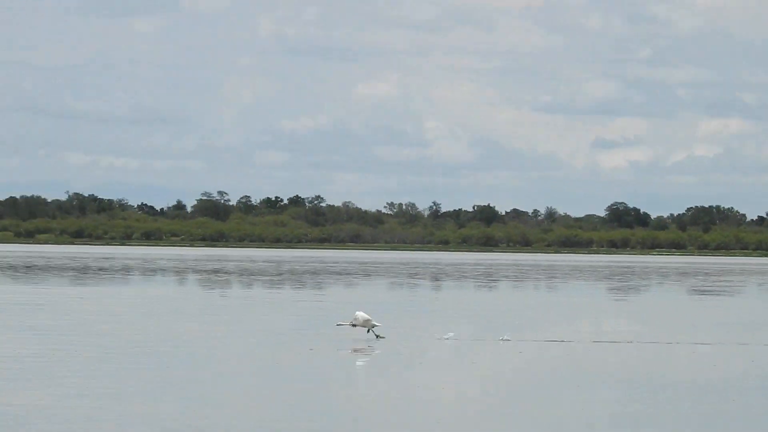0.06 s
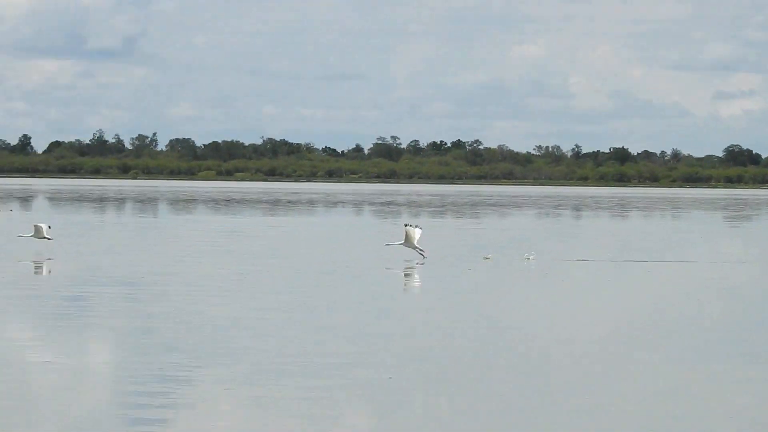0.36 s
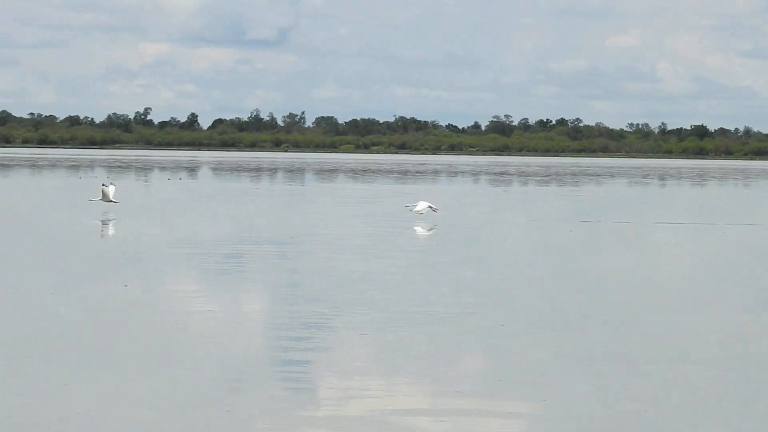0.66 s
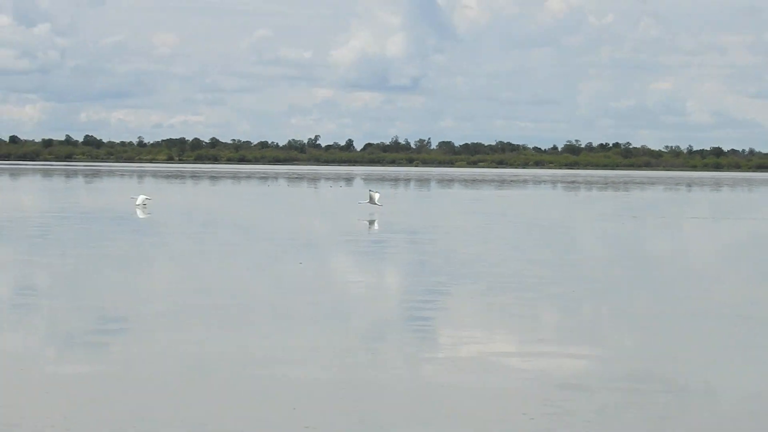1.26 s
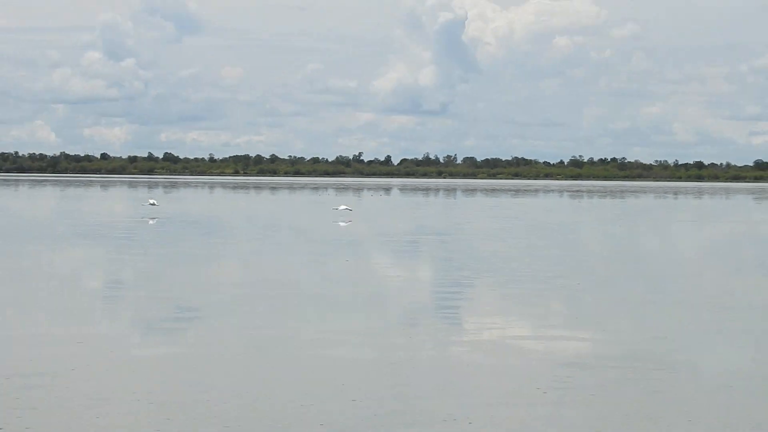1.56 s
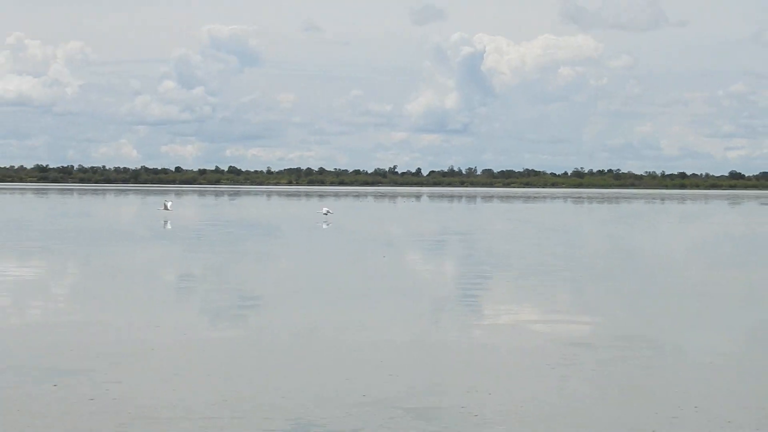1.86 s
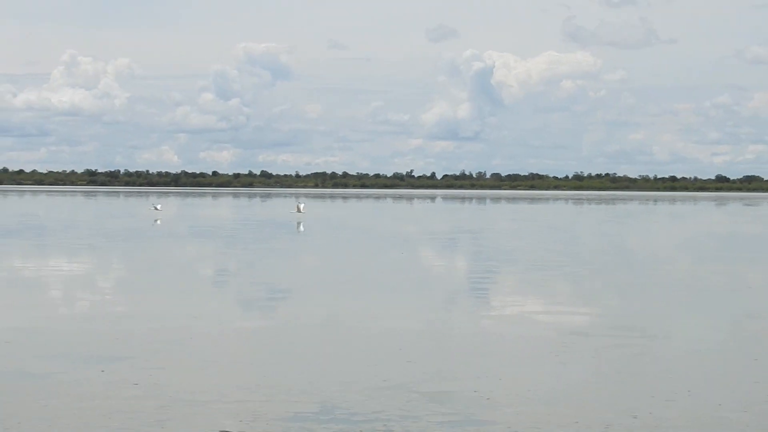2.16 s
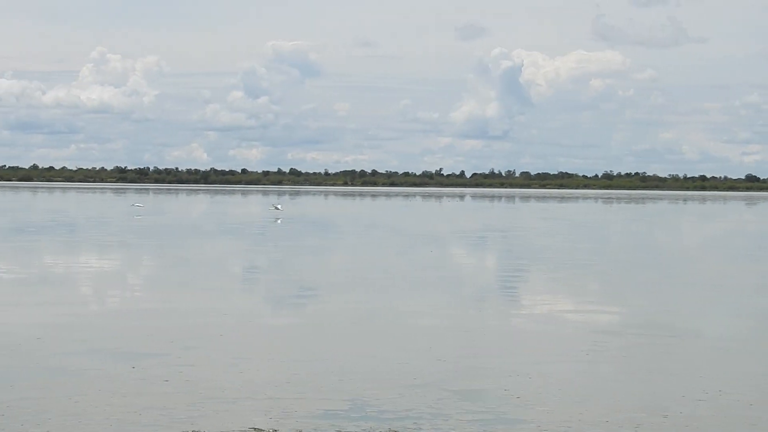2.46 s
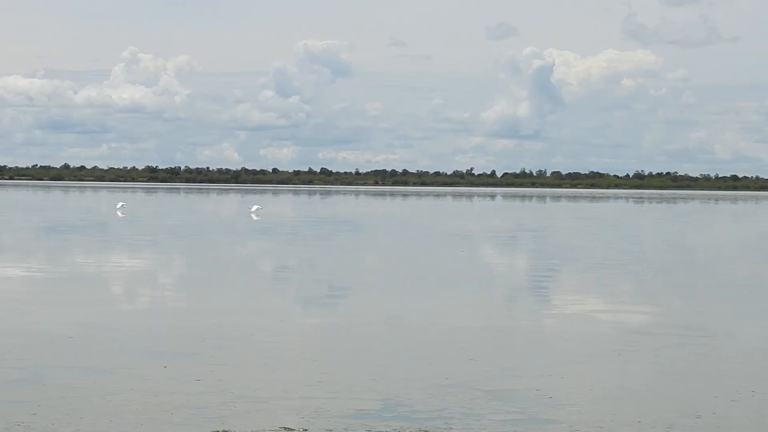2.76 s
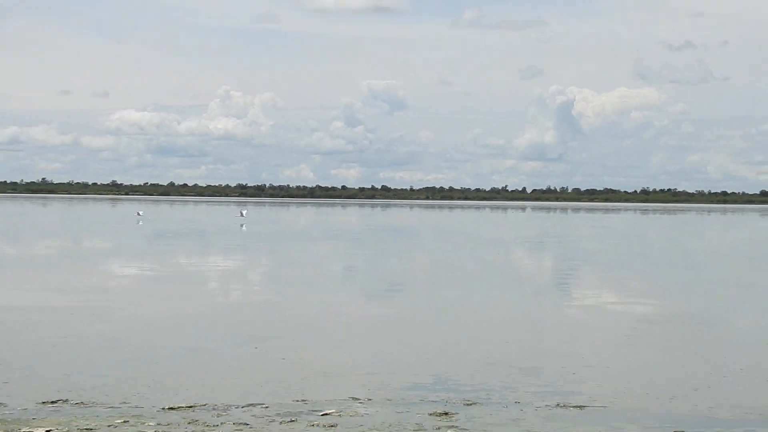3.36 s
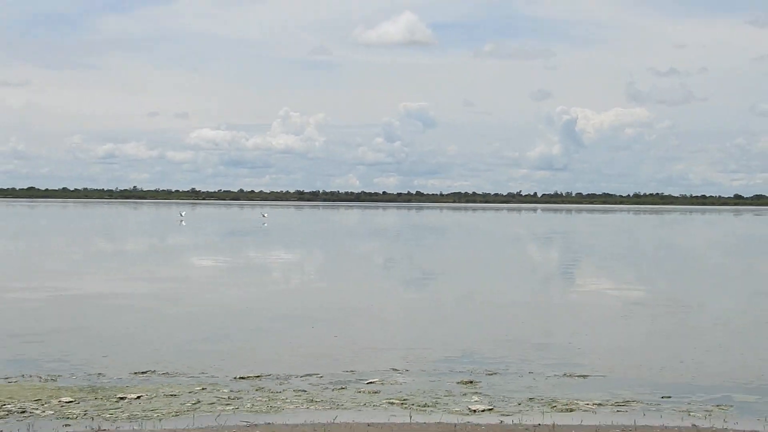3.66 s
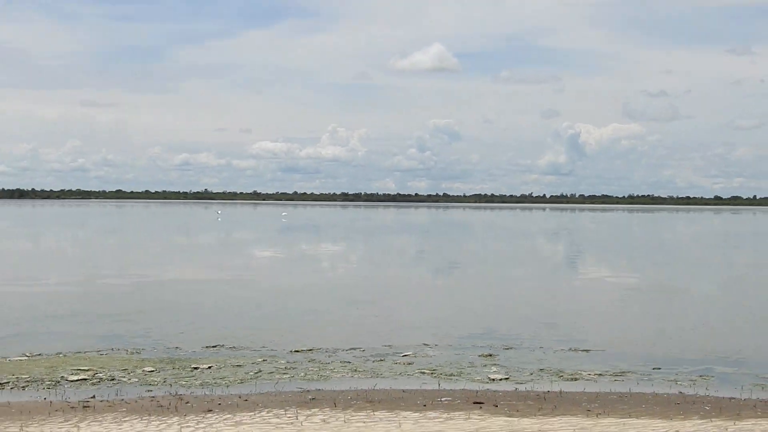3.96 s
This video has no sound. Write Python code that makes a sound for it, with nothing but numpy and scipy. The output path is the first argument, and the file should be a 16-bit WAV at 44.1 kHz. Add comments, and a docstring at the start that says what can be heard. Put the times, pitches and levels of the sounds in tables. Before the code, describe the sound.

Loud waterbird honks, some rough and some clear, overlap over open water, pause briefly, then close with one drawn-out call. Low wind rumble and faint hiss continue beneath, with a soft zoom whir and a few dull pops near the microphone.

```python
"""Two waterbirds trade loud honks over an open lagoon, each honk shaped by a throat and a beak.
One bird rasps, with an undertone an octave below its pitch; the other is clearer and flips
between a low and a high voice. Wind rumbles on the microphone openings over a faint hiss of air.
The camera's zoom motor whirs, stops, and starts again with a click of its lever.
A few dull pops and one short, bright scrape fall in between."""
import sys
import numpy as np
from scipy import signal
from scipy.fft import rfft, irfft, next_fast_len
from scipy.io import wavfile
from scipy.ndimage import uniform_filter1d, map_coordinates

SR = 44100
rng = np.random.default_rng(int(sys.argv[2]) if len(sys.argv) > 2 else 0)


def file_out(sig):
    """Save sig as 16-bit WAV at sys.argv[1]."""
    # one column per channel
    cols = np.atleast_2d(sig).T
    # limit, then scale
    lim = np.clip(cols, -1, 1)
    pcm = np.round(lim * 32767).astype(np.int16)
    wavfile.write(sys.argv[1], SR, pcm)


N = 176400


def amp(db):
    """Turn decibels into a number to multiply by."""
    return 10 ** (np.asarray(db) / 20)


def unit(x):
    """Scale a sound to an average strength (rms) of 1."""
    return x / np.sqrt(np.mean(x ** 2) + 1e-20)


def along(points, hz):
    """Read between rows of (frequency_hz, value), with the octaves evenly spaced."""
    frequencies, values = np.transpose(points)
    return np.interp(np.log(hz + 1), np.log(frequencies + 1), values)


def wobble(rate, size):
    """A smooth random curve through `rate` new values a second."""
    values = rng.standard_normal(size // 8 + 8)
    return map_coordinates(values, [np.arange(size) * rate / SR + 2], mode="wrap")


def filtered(x, response):
    """Turn each frequency up or down, or delay it, as response(hz) says."""
    n = x.shape[-1]
    padded = next_fast_len(n + SR // 8)
    return irfft(rfft(x, padded) * response(np.fft.rfftfreq(padded, 1 / SR)), padded)[..., :n]


def noise(colour):
    """Noise whose tone follows rows of (frequency_hz, gain_db)."""
    return unit(filtered(rng.standard_normal(N), lambda hz: amp(along(colour, hz))))


def wide_noise(colour, alike):
    """Stereo noise; rows of (frequency_hz, likeness) say how alike left and right are, 1 = the same."""
    def shares(hz):
        angle = np.arccos(np.clip(along(alike, hz), -1, 1)) / 2
        return np.array([np.cos(angle), np.sin(angle)])

    mid, side = filtered(np.array([noise(colour), noise(colour)]), shares)
    return unit(np.array([mid + side, mid - side]))


def bird_voice(rows, throat, undertone_db, beak):
    """One unbroken tone through throat and beak; uneven vibration adds undertones and a rough edge."""
    high_voice_hz, second_undertone_hz = 1150, 1287
    quaver, jitter_rad, flutter_db, hoarse_db = 0.0033, 0.24, 4, -11.5
    times, *columns = np.transpose(rows)
    at = np.arange(max(0, int(times[0] * SR)), min(N, int(times[-1] * SR)))
    pitch, level_db, rough = (np.interp(at / SR, times, column) for column in columns)
    n = len(at)
    pitch = uniform_filter1d(pitch, size=300) * (1 + quaver * wobble(130, n))
    phase = 2 * np.pi * np.cumsum(pitch) / SR + jitter_rad * rough * wobble(450, n)
    # In the high voice the vibration repeats every second cycle: a tone at half the pitch.
    high = 1 / (1 + np.exp((high_voice_hz - pitch) / 11))
    half = amp(undertone_db) * high + amp(-26.5) * rough
    # Near one pitch, or when rough, it repeats every fourth cycle: a quarter of the pitch.
    near = np.exp(-((pitch - second_undertone_hz) / 50) ** 2)
    quarter = amp(-7.5) * np.maximum(rough, near) * np.sqrt(half)
    voice, power = np.zeros(n), np.zeros(n)
    for k in np.arange(3, 40):
        multiple = k / 4
        hz = multiple * pitch
        grow = (multiple / 3) ** 0.56  # the in-between tones gain toward the treble
        share = [1, quarter * grow, half * grow, quarter * grow][k % 4]
        gain = amp(along(throat, hz) + beak(at / SR, hz) + flutter_db * wobble(28.54, n))
        hoarse = amp(hoarse_db) * rough * (wobble(380, n) + 1j * wobble(380, n)) / 2
        tone = np.exp(1j * (multiple * phase + rng.uniform(0, 2 * np.pi)))
        voice += gain * np.real((share + hoarse) * tone)
        power += (gain * share) ** 2 / 2
    loudness = amp(level_db + 2.8 * rough * wobble(255, n)) * signal.windows.tukey(n, .04)
    out = np.zeros(N)
    out[at] = loudness * voice / np.sqrt(power)
    return out


def honk(rows, throat, undertone_db, ring_start_hz, ring_end_hz, ring_db, treble_db):
    """A honk scoops up and sags away; at a flip, one voice dies as the other starts."""
    rise_s, fall_s, edge_bend = .028, 0.029, 0.61
    flip_ratio, flip_s = 1.11, 0.021  # a pitch leap this wide and this quick is a flip
    start, end = rows[0][0] - rise_s, rows[-1][0] + fall_s

    def beak(t, hz, shut_db=-22.5, open_s=0.026, treble_hz=4560, width_octaves=.3):
        """The beak's gain in dB: its ringing pitch slides, and the treble comes in as it opens."""
        ring_hz = np.interp(t, [start, end], [ring_start_hz, ring_end_hz])
        ring = np.exp(-(np.log2(hz / ring_hz) / width_octaves) ** 2)
        treble = treble_db + shut_db * np.exp(-((t - start) / open_s) ** 2)
        return ring_db * ring + treble / (1 + (treble_hz / hz) ** 10)

    def edge(row, shift_s, bend):
        """A lower, fainter, fully rough point where a tone begins or ends."""
        time_s, pitch_hz, level_db, _ = row
        return time_s + shift_s, pitch_hz * bend, level_db - 18.5, 1

    parts = [[edge(rows[0], -rise_s, edge_bend), rows[0]]]
    for before, after in zip(rows, rows[1:]):
        leap = max(before[1] / after[1], after[1] / before[1])
        if after[0] - before[0] < flip_s and leap > flip_ratio:
            parts[-1].append(edge(before, flip_s, 0.94))
            parts.append([edge(after, -flip_s, 0.97)])
        parts[-1].append(after)
    parts[-1].append(edge(rows[-1], fall_s, edge_bend))
    return sum(bird_voice(part, throat, undertone_db, beak) for part in parts)


def across_lagoon(call, echo_db=-7, echo_fade_s=0.091):
    """The shore adds a short echo; the camera body shades and delays one side against the other."""
    # How much louder the left side is: frequency_hz, gain_db
    balance = [(1400, 3.5), (2300, 6), (3400, 1), (5500, -3.5)]
    # How far the left side's wave is ahead: frequency_hz, lead_rad
    lead = [(3800, 0.23), (5400, 2.01), (7500, 2.3)]

    def left_and_right(hz):
        return np.array([amp(side * along(balance, hz) / 2) * np.exp(.5j * side * along(lead, hz))
                         for side in (1, -1)])

    t = np.arange(SR // 4) / SR
    tail = rng.standard_normal((2, len(t))) * np.exp(-np.log(1000) * t / echo_fade_s)
    echo = signal.fftconvolve(call[None], tail / np.linalg.norm(tail[0]), axes=1)[:, :N]
    return filtered(call, left_and_right) + amp(echo_db) * echo


def birds():
    """The rasping bird and the clear one overlap; the clear one's last call is a long wail."""
    # One honk a row: undertone_db, ring_start_hz, ring_end_hz, ring_db, treble_db,
    # then its path as a list of: time_s, pitch_hz, level_db, roughness (0 to 1)
    rasping_honks = [ (1.5, 2700, 2100, 7.2, -0.5, [(0, 1362, -14, 0), (.025, 1345, -17, 0),
                     (.065, 1282, -17.5, .43), (.108, 1245, -19.5, .65)]),
                     (0.5, 3500, 2700, 1.7, 0, [(.535, 1363, -19, .6), (.59, 1382, -15, .02),
                     (.66, 1309, -16.5, .25), (.698, 1230, -19.5, 0.5)]),
                     (3.5, 3000, 5300, 2.6, 0.5, [(1.045, 1064, -20.5, 0.9), (1.06, 1394, -16.5, 0.2),
                     (1.1, 1379, -17, 0.1), (1.16, 1325, -15.5, 0.1), (1.2, 1288, -15.5, .56)]),
                     (-3.5, 4200, 3900, 2.6, 1, [(1.622, 992, -21.5, 0.5), (1.637, 1080, -17.5, 0.3),
                     (1.648, 1388, -16.5, .33), (1.68, 1355, -16.5, 0.2), (1.72, 1270, -17.5, .35),
                     (1.77, 1282, -15.5, 0.3), (1.8, 1244, -18.5, 0.4), (1.82, 1110, -22, 0.5)]),
                     (-4.5, 7000, 4200, 5.2, 1.5, [(2.18, 1294, -18, .35), (2.25, 1284, -16, .12),
                     (2.345, 1257, -19, .2), (2.366, 1200, -26, .6)]),
                     (-6.5, 3000, 2090, 7.1, 1, [(2.675, 942, -23.5, 1), (2.714, 1014, -22, 0.2),
                     (2.728, 1250, -21, 0.9), (2.785, 1298, -14.5, .05), (2.835, 1256, -19.5, 0.4),
                     (2.878, 1200, -21, 0.45)])]
    clear_honks = [ (-41, 3440, 2980, 9.4, 1, [(.285, 987, -18, 1), (.315, 1094, -11, 0.042),
                   (.348, 1113, -16, 0.025), (.38, 1056, -14, .03), (.455, 997, -15.5, 0.057),
                   (.508, 882, -16, 0.53)]), (-52, 2650, 2000, 6.6, -0.5, [(1.22, 1070, -15, 0.5),
                   (1.252, 1125, -15, .2), (1.267, 1260, -13, 0.068), (1.305, 1221, -16, 0.027),
                   (1.376, 1175, -16, 0.055), (1.386, 967.5, -18.5, .1), (1.445, 944, -21, 0.14),
                   (1.47, 853, -23, 0.97)]), (-22, 3600, 2600, 1.6, 3.5, [(2.113, 948, -22.5, 0.92),
                   (2.145, 1022, -14.5, .25), (2.174, 1028, -19.5, 0.34), (2.185, 1233, -20, .35),
                   (2.25, 1212, -18, .15), (2.298, 1164, -17.5, 0.44), (2.318, 989, -22.5, 0.27),
                   (2.355, 785, -23.5, 1)]), (-8, 4470, 1670, 8.6, -1.5, [(3.613, 1110, -33, 0.67),
                   (3.635, 1125, -41.5, .57), (3.642, 1107, -16.5, .05), (3.657, 1140, -14.5, .1),
                   (3.668, 1201, -19.5, 0.4), (3.695, 1196, -22, 0.49), (3.735, 1173, -19.5, 0.078),
                   (3.825, 1236, -24.5, 0.17), (3.905, 1148, -21.5, .5), (3.93, 1190, -23, .4),
                   (3.992, 1108, -26, 0.37)])]
    # How each bird's throat and beak colour its voice: frequency_hz, gain_db
    rasping_throat = [(600, -69.5), (950, -18), (1260, 0), (1650, -20), (2050, -2), (3000, -1), (3800, -1),
                      (4350, -15), (5100, -1.5), (6100, 1.5), (7300, -6.5), (8300, -17.5), (9900, -62)]
    clear_throat = [(600, -49), (950, -16), (1230, -10), (1600, -3), (2000, 0), (2450, -2), (3300, 3.5),
                    (4300, -12.5), (5300, 0.5), (6200, 3), (7300, -6), (8300, -23.5), (9900, -60)]
    voices = [(rasping_honks, rasping_throat), (clear_honks, clear_throat)]
    return sum(across_lagoon(honk(rows, throat, *tone))
               for honks, throat in voices for *tone, rows in honks)


def wind(lumps_db=3, lean_left_db=3.0, flap_db=-20):
    """Gusts buffet each microphone opening, the left one harder; the strongest add a higher flapping."""
    # The wind's strength: time_s, level_db
    gusts = [(0, -25), (.35, -29), (.62, -20), (1.35, -19), (3.05, -20), (3.55, -28), (3.85, -21)]
    # The tone of the rumble and of the flapping: frequency_hz, gain_db
    rumble_colour = [(25, -28.5), (72, 2), (120, 1.5), (180, -5), (270, -28), (1000, -80.5)]
    flap_colour = [(120, -11.5), (220, -2.5), (450, -20), (900, -54.5)]
    gust = amp(np.interp(np.arange(N) / SR, *np.transpose(gusts)))
    lumps = amp(lumps_db * np.array([wobble(21.98, N) for side in range(2)]))
    rumble = gust * unit(lumps * wide_noise(rumble_colour, alike=[(100, 0.038)]))
    flaps = unit((gust * lumps) ** 2 * np.array([noise(flap_colour), noise(flap_colour)]))
    return rumble * amp([[lean_left_db], [-lean_left_db]]) + amp(flap_db) * gust.mean() * flaps


def air(level_db=-46.5):
    """The faint, steady hiss of open air."""
    # The tone of the hiss: frequency_hz, gain_db
    colour = [(350, -9.5), (800, -5), (2500, -12.5), (8000, -22), (11000, -39)]
    return amp(level_db) * wide_noise(colour, alike=[(500, 0.78), (5000, 0.35)])


def zoom_motor(ramp_s=0.18, step_hz=238.4, buzz_depth=0.21, waver_hz=10, waver_depth=0.012):
    """A motor whirs in tiny steps inside the camera body, with gear tones that waver together."""
    # When the motor runs: start_s, end_s, level_db
    runs = [(-.1, 2.088, -40), (3.116, 4.1, -42)]
    # How the camera body rings: frequency_hz, gain_db
    body = [(300, -47.5), (600, 7.5), (780, -2.5), (950, 12.5), (1300, -2.5), (2150, -6), (2530, -2.5),
            (2780, -11.5), (3450, 5), (3900, -23), (5200, -9), (7200, -0.5), (8150, -22), (8800, -6.5),
            (10500, -32.5)]
    # How alike the whir is on left and right: frequency_hz, likeness (0 to 1)
    alike = [(1500, 1), (4500, 0.27)]
    # The gears' tones: pitch_hz, level_db (compared with the whir)
    gears = [(946, 0), (671.5, -10.5), (2500, -12.5)]
    t = np.arange(N) / SR
    running = sum(amp(db) * np.clip(np.minimum(t - start, end - t) / ramp_s + .5, 0, 1)
                  for start, end, db in runs)
    buzz = 1 + buzz_depth * np.sin(2 * np.pi * step_hz * t)
    whir = unit(wide_noise(body, alike) * buzz)
    speed = 1 + waver_depth * (.5 * np.sin(2 * np.pi * waver_hz * t) + wobble(20, N))
    turn = 2 * np.pi * np.cumsum(speed) / SR
    whine = sum(amp(db) * unit(np.sin(hz * turn)) for hz, db in gears)
    return running * (whir + whine)


def bursts(rows, colour, attack_s, boost_db=11.0):
    """Short bursts of noise, each lifted by boost_db and dying away by 60 dB in its fade_s."""
    loudness = np.zeros(N)
    for start_s, strength_db, fade_s in rows:
        age = np.maximum(np.arange(N) / SR - start_s, 0)
        rise = 1 - np.exp(-age / attack_s)
        loudness += amp(strength_db + boost_db) * rise * np.exp(-np.log(1000) * age / fade_s)
    return loudness * noise(colour)


def pops():
    """Dull pops and bumps that do not ring."""
    # One pop a row: start_s, strength_db, fade_s
    hits = [(1.747, -22, 0.028), (2.297, -34, .07), (2.522, -38.5, 0.036), (2.69, -28.5, 0.048),
            (3.089, -25.5, 0.065)]
    # Their muffled tone: frequency_hz, gain_db
    colour = [(400, -9), (850, 0), (1500, -7), (3000, -23), (12000, -65)]
    return bursts(hits, colour, attack_s=.005)


def scrape():
    """One short, bright scrape."""
    # The single stroke: start_s, strength_db, fade_s
    stroke = [(2.68, -32, .085)]
    # Its hissy tone: frequency_hz, gain_db
    colour = [(4500, -13), (7300, 0.5), (10000, -27)]
    return bursts(stroke, colour, attack_s=.007)


def lever_clicks():
    """The zoom lever clicks sharply as the motor starts again."""
    # One click a row: start_s, strength_db, fade_s
    clicks = [(3.034, -43.5, 0.046), (3.086, -29.5, 0.014), (3.109, -40, .02)]
    # The lever's tone: frequency_hz, gain_db
    colour = [(600, -2), (1750, -2.5), (2600, -13), (3700, -2.5), (4500, -10), (11000, -40.5)]
    return bursts(clicks, colour, attack_s=0.00076)


def scene():
    """Birds over wind and faint hiss, with the camera's own noises."""
    return birds() + wind() + air() + zoom_motor() + pops() + scrape() + lever_clicks()


def record(dry):
    """The camera keeps nothing above its highest frequency."""
    top_hz = 15800
    return filtered(dry, lambda hz: hz < top_hz)


dry = scene()
out = record(dry)
file_out(out)
```